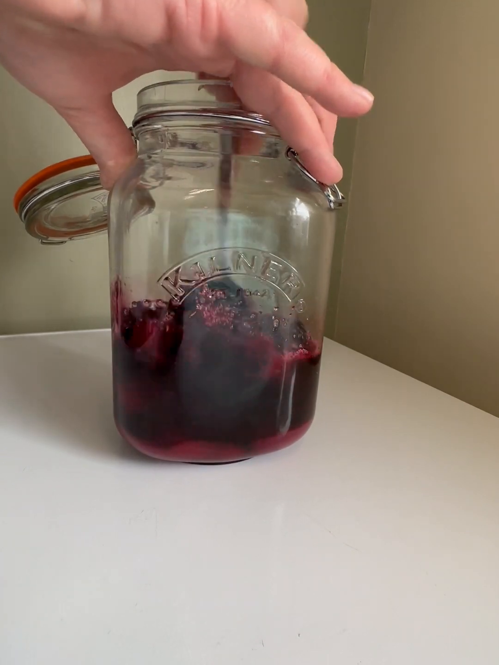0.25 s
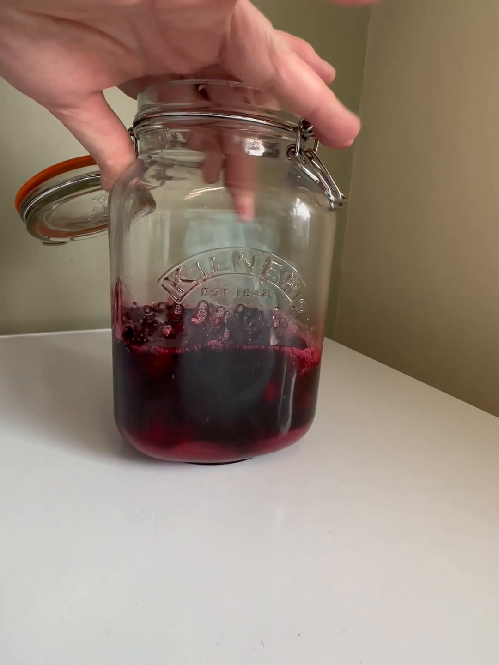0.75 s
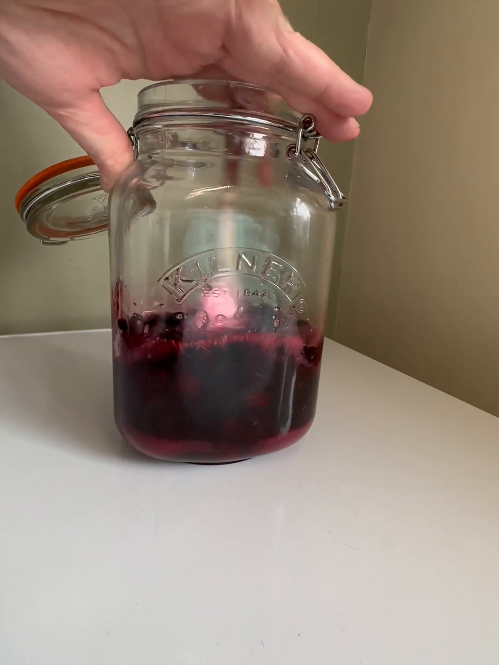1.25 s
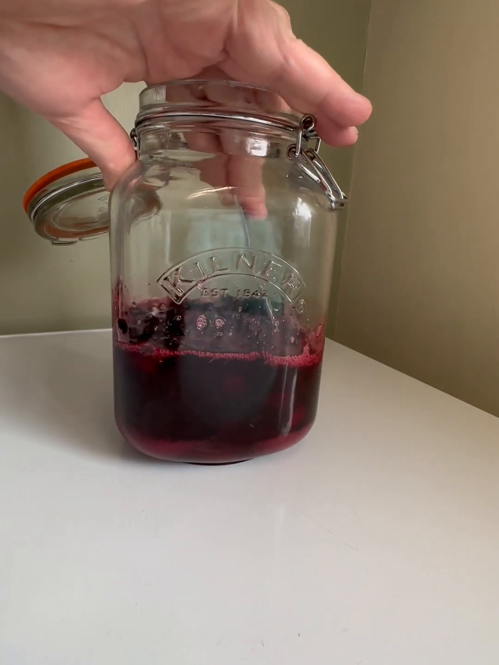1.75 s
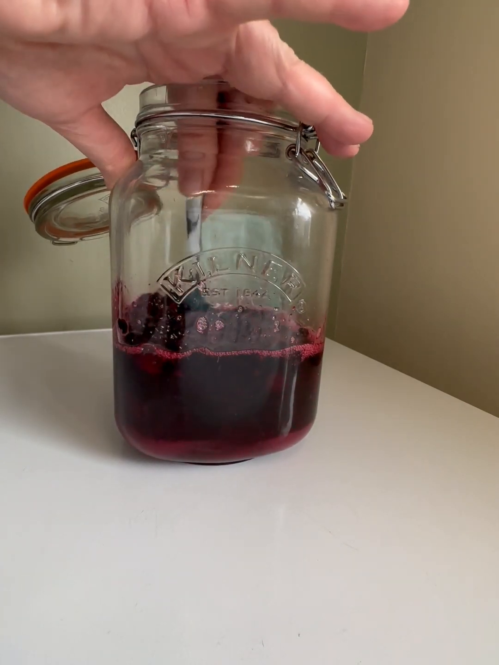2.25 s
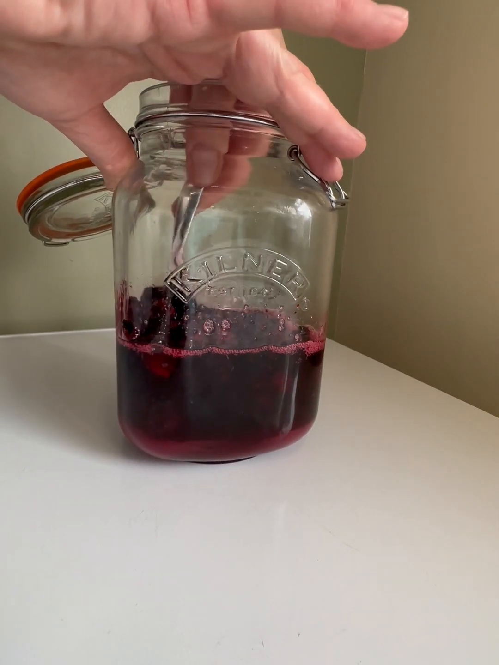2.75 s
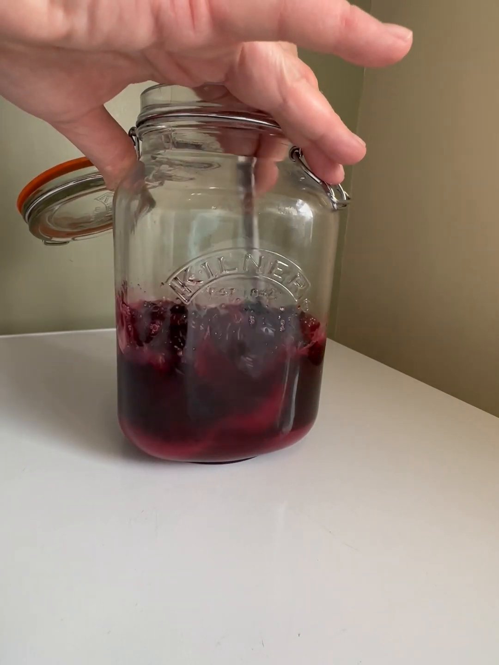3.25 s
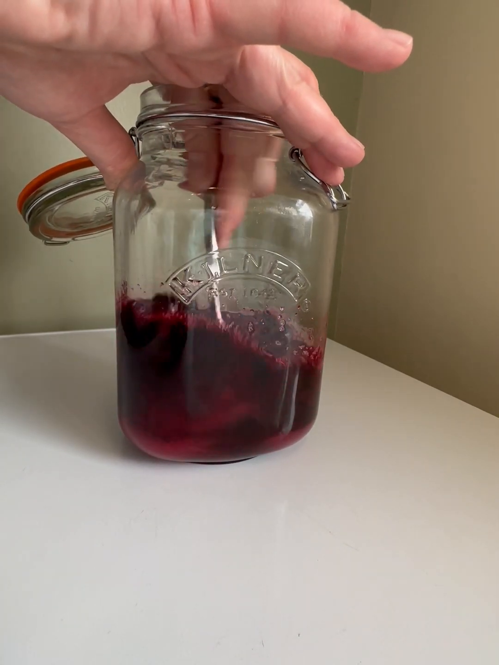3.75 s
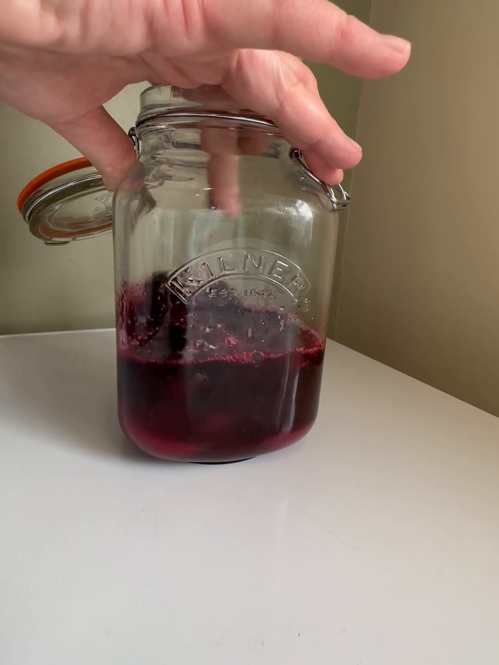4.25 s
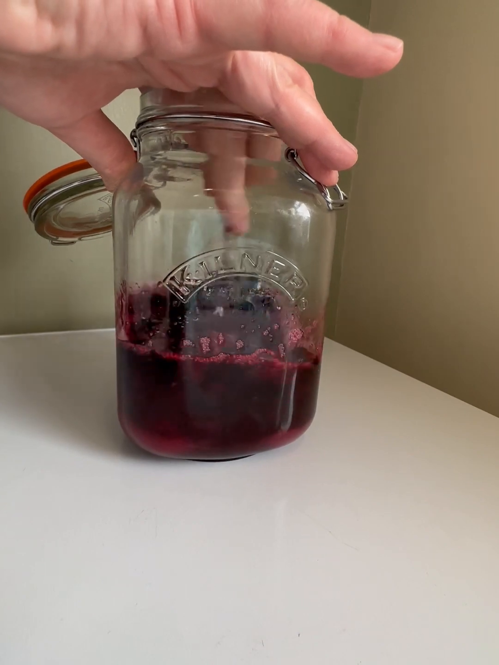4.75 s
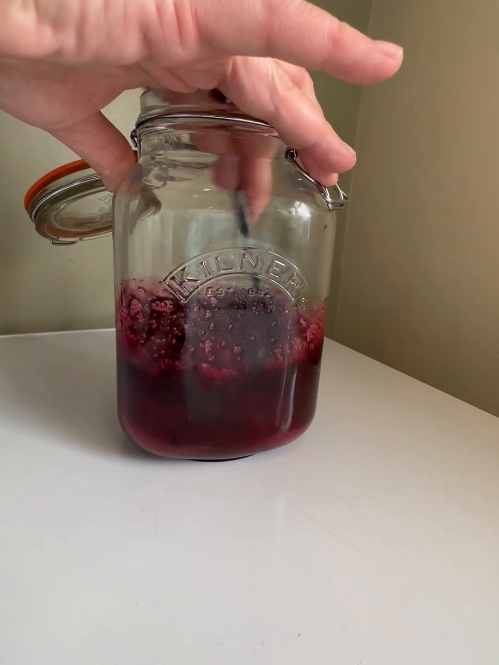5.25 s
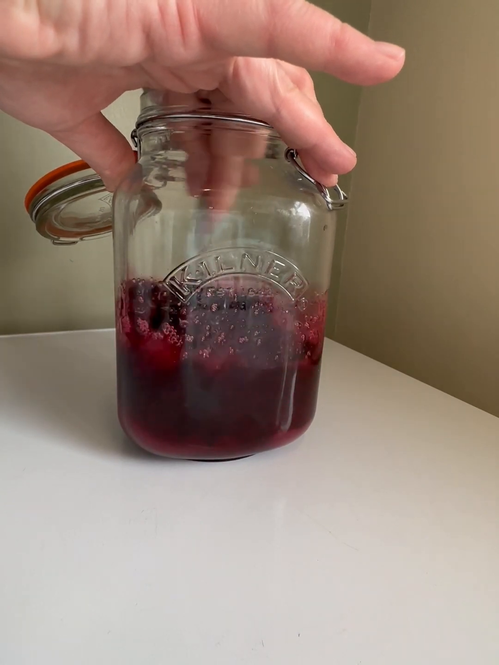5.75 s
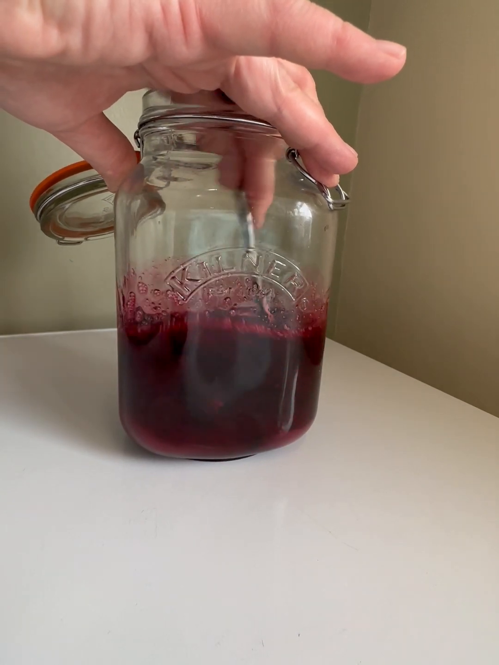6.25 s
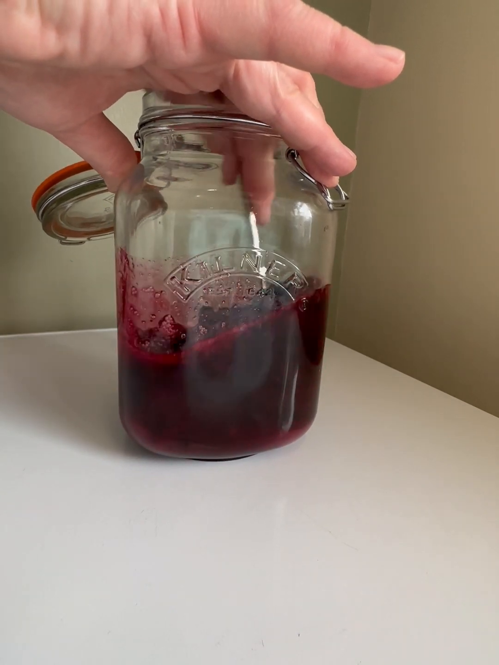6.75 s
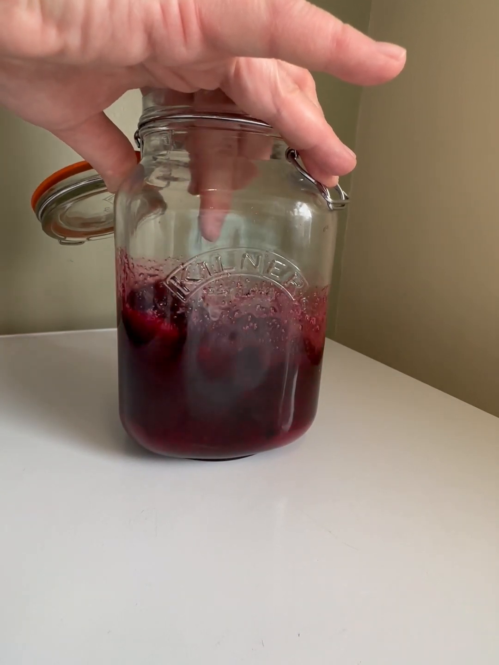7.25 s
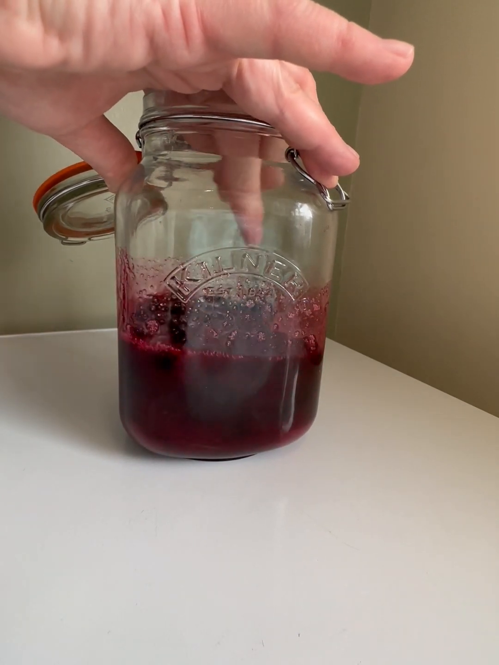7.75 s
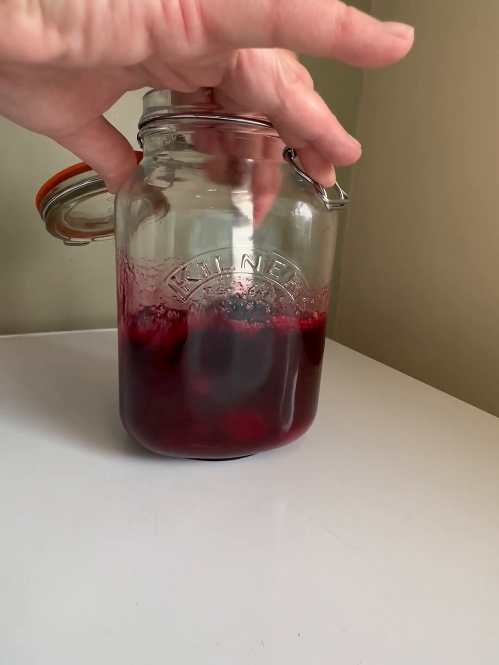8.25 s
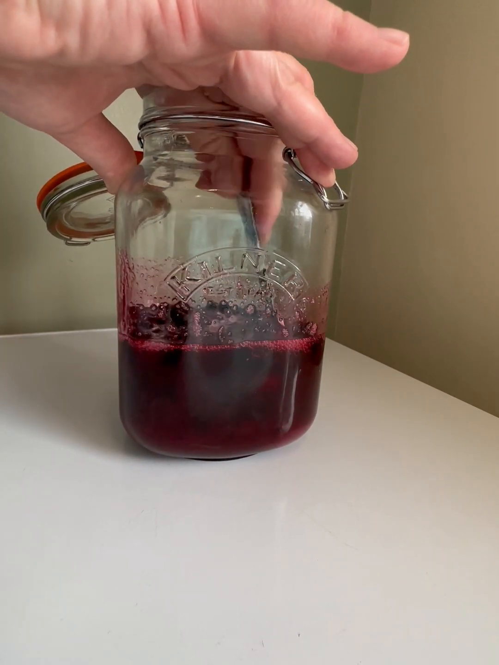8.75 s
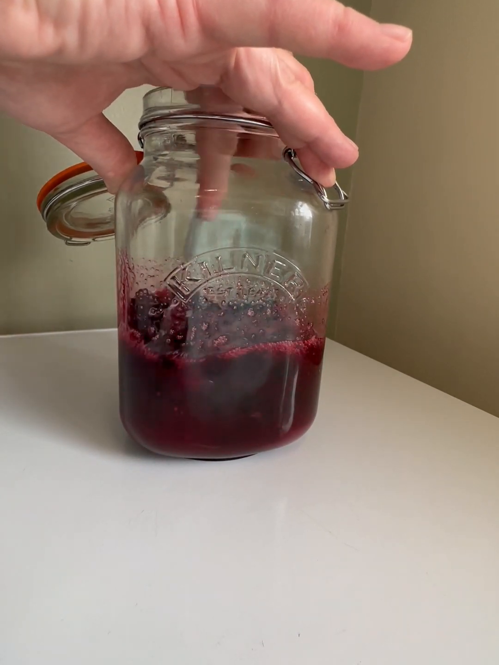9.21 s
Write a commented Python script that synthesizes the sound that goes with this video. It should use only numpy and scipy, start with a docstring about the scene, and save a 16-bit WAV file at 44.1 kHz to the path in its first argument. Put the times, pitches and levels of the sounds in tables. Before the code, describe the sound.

A spoon stirs syrupy berries in a thick glass jar, with dull clinks, gritty sugar scraping, wet squelches and low counter thumps, growing busier.

```python
"""Spoon stirring berries in a glass jar

A spoon stirs berries and sugar in a thick glass jar on a kitchen counter, heard close up in stereo.
Blows on the syrup-damped glass are short tone pairs with a noisy crunch; strokes grind sugar as
resonant noise and pings; the fruit squelches in rising blobs of tone; shoves and drags ring the
counter's low modes. Lone rings, thin whines, an early dull swish and a low room hum lie around them.
"""
import sys
import numpy as np
from scipy import signal
from scipy.fft import rfft, irfft, next_fast_len
from scipy.io import wavfile
from scipy.ndimage import uniform_filter1d, map_coordinates

SR = 44100
rng = np.random.default_rng(int(sys.argv[2]) if len(sys.argv) > 2 else 0)


def materialize(psi):
    """Save the field psi as 16-bit PCM at rate SR to the path in sys.argv[1].

    A 1-D psi becomes a single channel; in a 2-D psi each row is a channel.
    """
    bounded = np.clip(np.atleast_2d(psi).T, -1, 1)
    quanta = np.round(bounded * 32767).astype(np.int16)
    wavfile.write(sys.argv[1], SR, quanta)


def invert_db(level):
    """Linear amplitude ratio for a level in decibels (20 dB per decade), elementwise."""
    return 10 ** (np.asarray(level, dtype=float) / 20)


N = 418068  # length in samples

# Clear blows of the spoon on glass. Each row: start in seconds, knock level in dB before trims,
# knock pitch in Hz, upper ring pitch in Hz, upper ring and treble in dB relative to the knock.
BLOWS = [(0.031, -53, 820, 3220, 4, -16), (0.242, -57.5, 824, 3740, -1, -3),
         (0.733, -49, 1000, 2420, -11, -35), (0.778, -36, 2270, 4540, -6, -7),
         (0.782, -19.5, 1440, 2480, -10.5, -30), (0.82, -38, 1200, 2360, -9, -24),
         (0.833, -17.5, 1155, 2350, -9, -37), (0.886, -31.5, 1250, 2250, -18, -35),
         (0.9025, -34.5, 2130, 3300, -8, -38), (1.072, -31.5, 1530, 4530, 2, -19),
         (1.27, -43.5, 1640, 2540, -9, -8.5), (1.586, -38, 784, 3120, 4, 1.5),
         (1.635, -35, 1660, 3020, -0.5, -10), (1.691, -29, 1650, 3300, -2, -12),
         (1.949, -17.5, 1524, 2900, -3.5, -40), (1.998, -32, 1570, 3080, -13, -12.5),
         (2.24, -46.5, 1780, 5410, -21, 6.5), (2.498, -44, 1170, 3170, -5, -6),
         (2.515, -47.5, 802, 2450, 8, 2), (2.53, -35, 810, 2950, 3.5, 9.5),
         (2.56, -44.5, 805, 3020, 2.5, 5), (2.66, -52, 1600, 5740, -4, 5.5),
         (2.671, -45, 1070, 3220, -3, -6), (2.695, -41, 1030, 3200, 2, -2.5),
         (2.761, -31, 1550, 3300, -9.5, -4), (2.817, -34, 1110, 5630, -3, -10),
         (2.827, -45, 1530, 3240, 0, -7), (2.929, -42, 1480, 3800, -1, -13), (2.98, -45, 1460, 3250, 2, 1),
         (3.016, -36.5, 1800, 3030, -6, -15), (3.238, -38, 1165, 3800, -7.5, -13),
         (3.493, -31, 1240, 2610, -8.5, -8), (3.684, -27, 1080, 2630, -7.5, -16),
         (3.716, -17.5, 1084, 3500, -17, -38), (3.833, -34, 1100, 2620, -17, -12.5),
         (4.133, -39.5, 1800, 2520, -7.5, -17), (4.356, -39, 2120, 3010, 6, 3),
         (4.629, -43.5, 1990, 2500, -1.5, -22), (4.747, -29.5, 930, 2220, -9.5, -8.5),
         (4.817, -45, 1620, 3800, -5, -3), (4.833, -33.5, 1390, 3580, -9.5, -10.5),
         (4.881, -33.5, 1440, 3240, -8.5, -5), (4.933, -27.5, 1590, 4010, -6, 1.5),
         (4.982, -23, 1630, 3330, -7.5, -5), (4.991, -17.5, 1040, 3060, -3, -12.5),
         (5.105, -35.5, 1980, 4180, -2, -5), (5.143, -46.5, 2170, 3260, 9.5, -2),
         (5.163, -38, 1130, 4120, -0.5, -5), (5.36, -22, 1510, 3720, -18, -21.5),
         (5.423, -33.5, 1200, 4070, -11, 1), (5.438, -18, 1120, 2120, -21, -33),
         (5.475, -43, 1210, 3060, -1, -15), (5.495, -42, 2140, 3130, -8, -17),
         (5.529, -43, 1760, 2610, -1, 0), (5.653, -37.5, 1800, 2930, -5.5, -7),
         (5.695, -32, 1110, 2760, -8, -14), (5.711, -28, 1450, 2950, -3.5, -5.5),
         (5.829, -31, 1280, 3520, -14, -30), (5.873, -31, 1710, 2200, -6.5, -13),
         (5.913, -38.5, 1280, 3580, 3.5, -1), (5.931, -20, 1390, 3070, -3.5, -7),
         (6.259, -18, 1540, 2630, -2.5, -8.5), (6.363, -22.5, 1790, 2810, -2.5, -12),
         (6.42, -9.5, 1155, 2560, -38, -37), (6.461, -30.5, 2000, 4260, 6, -15),
         (6.475, -33.5, 1800, 3640, 7.5, -7.5), (6.504, -35.5, 1830, 2800, 11, 1),
         (6.525, -37, 1200, 2620, -4, -10), (6.775, -37, 1520, 3050, -5, -8),
         (6.813, -17.5, 1430, 2630, -2.5, -11.5), (6.897, -35.5, 904, 2570, -11, -14),
         (6.942, -37.5, 1500, 3580, -0.5, -18), (7.021, -35, 1720, 2470, -12, -34),
         (7.3643, -4, 1104, 4070, -19.5, -18.5), (7.423, -26.5, 1155, 2350, -7, -7),
         (7.432, -43, 1850, 2220, 3.5, 3), (7.471, -42, 1540, 2870, -6, -19),
         (7.521, -40, 2130, 2240, 3.5, 3), (7.627, -24, 1800, 3990, -3, -2),
         (7.645, -26, 1800, 2390, -1.5, -7), (7.725, -42, 920, 2440, -19, -12),
         (7.836, -27.5, 1740, 3020, -8, -30), (7.846, -7, 900, 2960, -26, -49),
         (7.901, -11.5, 1480, 2390, -10, -18.5), (7.96, -32, 1720, 2580, -18, -18),
         (7.995, -37.5, 1580, 3830, -13, -26), (8.019, -37, 1850, 3960, 5, -21),
         (8.033, -28, 1090, 3160, -2, -9), (8.054, -30.5, 1580, 3120, -9, -1),
         (8.059, -25, 955, 5350, -2, 3.5), (8.089, -41.5, 1560, 3040, 4, -13),
         (8.131, -30, 1120, 2820, -5, -6), (8.15, -26.5, 1236, 2180, -11.5, -18),
         (8.205, -36, 1210, 2550, -30, -19), (8.391, -30, 1850, 3220, 0.5, -1.5),
         (8.459, -38, 1700, 3190, 6, -3), (8.469, -31, 1700, 3180, 1, -5), (8.52, -38, 1210, 3400, 2, -15),
         (8.648, -28.5, 1710, 2300, -6.5, -9.5), (8.672, -35.5, 1720, 2580, -7, -7),
         (8.869, -16, 1390, 2727, -2.5, -10), (8.887, -29, 1170, 3250, 2.5, -11),
         (8.922, -16.5, 1146, 2470, -23, -33), (8.936, -26, 1360, 2350, -8, -26),
         (8.942, -22, 1090, 2830, -12, -36), (8.957, -36, 1150, 2450, -4, -12),
         (8.981, -40.5, 1330, 3700, -2, -3), (9.022, -25, 1970, 2780, -9, -12),
         (9.066, -33.5, 1800, 4500, -5.5, -10), (9.083, -25.5, 880, 3160, -37, -35),
         (9.139, -36.5, 1680, 3870, 5, -5.5), (9.397, -43.5, 1730, 2370, -8.5, -32)]
# Shoves that rock the jar on the counter. Each row: start in seconds, level in dB before trims,
# middle modes and upper modes in dB relative to it.
SHOVES = [(0.602, -22.5, -23, -61), (0.713, -16, -10, -27), (0.966, -20.5, -15.5, -28.5),
          (1.116, -31.5, -13, -37), (1.513, -32, 0, -14), (1.639, -26, -2, -8), (1.694, -16, -13, -16.5),
          (1.918, -22, -36, -34), (1.989, -33, 2.5, -7), (2.131, -31, -9, -21), (2.427, -31, 3.5, -31),
          (2.526, -26.5, -3, -24), (2.797, -40, 6, -5.5), (2.996, -36.5, 1.5, -7), (3.246, -31, -11, -10.5),
          (3.497, -22.5, 1.5, -6.5), (3.686, -22.5, -2.5, -18), (3.83, -33, 2.5, -8.5),
          (4.148, -33.5, -17, -20), (4.477, -25, -8.5, -24.5), (4.596, -16.5, -12.5, -46),
          (4.631, -16.5, -1.5, -17), (4.75, -22.5, -3.5, -18), (4.88, -24.5, -26, -15),
          (5.106, -30, -21, -22), (5.439, -18, -8.5, -10.5), (5.655, -22.5, -5.5, -11.5),
          (5.733, -20.5, -18, -18.5), (5.927, -22, -4.5, -7.5), (6.113, -17, -3, -23),
          (6.255, -19.5, -3, -4.5), (6.361, -20.5, -9, -17), (6.422, -13, 0.5, -11),
          (6.653, -27.5, -17, -32), (6.792, -16.5, -7, -15), (7.032, -26, -33, -21), (7.362, -27, -1, -5),
          (7.631, -24.5, -6, -26), (7.846, -17, -29, -14.5), (7.9, -19, -11, -8.5), (7.92, -5, -5.5, -22),
          (8.06, -33, -46, -10.5), (8.167, -21, -7.5, -12.5), (8.514, -18, -0.5, -14),
          (8.653, -32.5, 4, 2.5), (8.879, -14, -1, -33), (9.018, -26, -7, -10)]
# Jar wall, damped by syrup and hand. Each row: resonance in Hz, width in Hz, gain in dB.
WALL_MODES = [(1000, 383, 3), (1550, 395, 4.5), (1800, 420, 2), (2630, 81, 0), (3016, 450, -3.5),
              (4200, 1400, -8.5), (5180, 710, 1), (6460, 880, 3.5), (7720, 3530, -3.5), (15300, 1000, -13)]
# Counter top. Each row: mode in Hz, relative level in dB, t60 in seconds.
COUNTER_MODES = [(73.9, -3, 0.22), (142.3, -0.5, 0.11), (150.4, -7, 0.061), (257.2, -2, 0.15),
                 (307.3, 0, 0.21), (411, -12, 0.041), (543, -7.5, 0.18), (678, -61, 0.54),
                 (795, -23.5, 0.13)]
# Colour of the grinding noise. Each row: frequency in Hz, relative density in dB per Hz.
GRINDING_COLOUR = [(290, -26), (500, 4.5), (787, -8), (1610, -7.5), (2430, -1.5), (3210, -16.5),
                   (4900, -19), (6100, -24.5), (7710, -20.5), (8930, -24.5), (12300, -73), (15100, -24),
                   (16500, -33)]
# Colour of the room tone. Each row: frequency in Hz, relative density in dB per Hz.
ROOM_COLOUR = [(15, -21), (25, 4.5), (53, 12.5), (76, 7.5), (154, 3), (214, -9.5), (470, -8), (510, -6.5),
               (787, -16.5), (1090, -23), (2400, -29), (2980, -30), (3910, -28), (7920, -107), (16500, -85)]
# Phase lead of left over right, nearly opposite at 10 to 14 kHz. Each row: frequency in Hz, lead in
# radians.
LEFT_LEAD = [(0, 0), (500, -.5), (800, -1.2), (1300, -1), (1600, .2), (2500, .6), (4200, .2), (4800, -2.5),
             (5200, -3), (6100, -7.2), (7750, -9.3), (9000, -7.8), (10200, -9.4), (13800, -9.5),
             (15500, -10.4)]
# Balance of left and right. Each row: frequency in Hz, left minus right in dB.
LEFT_TILT = [(60, -0.39), (130, 0.5), (290, 0.37), (640, 1), (1410, -0.4), (3100, -0.43), (6820, -0.67),
             (15000, 0.18)]
# Likeness of left and right before the lead is applied. Each row: frequency in Hz, likeness from 0 to 1.
LIKENESS = [(30, .5), (70, .87), (170, .99), (350, .6), (700, .05), (1300, .3), (1800, .7), (2500, .6),
            (4000, .5), (9000, .5), (10500, .96), (13800, .96), (15500, .5)]
# The spoon's own clink. Each row: pitch in Hz, relative level in dB.
SPOON_MODES = [(4400, -33), (5450, -7), (6200, -5)]
# Strokes along the wall. Each row: start in seconds, end in seconds, then grinding, brightness and
# drag of the jar's foot as control levels in dB.
WALL_STROKES = [(0, 0.066, -62, -65, -48.5), (0.977, 1.6, -74, -74, -66), (1.585, 1.768, -69, -67.5, -47.5),
                (1.839, 2.277, -54, -62.5, -49.5), (2.327, 2.435, -57.5, -72, -50),
                (2.486, 2.584, -64, -62, -46.5), (2.68, 3, -50.5, -61, -47.5),
                (3.6, 3.683, -51.5, -58, -43), (3.677, 3.723, -51, -79, -34), (3.79, 4.175, -55, -70, -60),
                (4.558, 4.67, -75, -66.5, -46), (4.764, 5.028, -49, -60.5, -45.5),
                (5.119, 5.19, -70, -58.5, -42.5), (5.437, 5.584, -53.5, -60, -51),
                (5.71, 5.727, -62, -60, -42.5), (5.85, 5.987, -44.5, -63.5, -47),
                (6.271, 6.537, -47, -65, -47), (6.647, 7.045, -58, -64, -47.5),
                (7.382, 7.456, -44, -65, -44), (7.633, 7.788, -47, -61.5, -42.5),
                (7.844, 8.157, -45.5, -56.5, -41), (8.472, 8.552, -41.5, -54.5, -41.5),
                (8.824, 9.127, -70, -60.5, -41)]
# Control levels between strokes, one row: grinding in dB, brightness in dB, drag in dB.
RESTING_DB = (-88, -79.5, -56)
# Wavering whines, some from the rubbed wall. Each row: start in seconds, end in seconds, centre in Hz,
# width in Hz, mid-waver level in dB.
THIN_WHINES = [(0.11, 0.5, 4020, 200, -69), (0.95, 1.6, 2460, 60, -70), (1.35, 1.6, 7900, 120, -67.5),
               (2.12, 2.3, 2370, 70, -74), (4.847, 4.898, 1530, 200, -53)]
# Tones that outlast a blow or bubble up alone. Each row: start in seconds, pitch in Hz, level in dB,
# t60 in seconds.
LONE_TONES = [(0.786, 3000, -43, .07), (1.995, 1550, -36.5, 0.12), (3.722, 1475, -48, 0.25),
              (8.153, 2070, -28, 0.044), (8.172, 535, -18.5, 0.057), (8.872, 2710, -19.5, 0.072),
              (3.045, 1800, -54, .2), (4.663, 568, -38, .1), (7.847, 914, -14, 0.05)]
# Detuning spread of each counter mode per shove, one row: a fraction of the pitch for each mode.
MODE_SCATTER = (.04, .07, .07) + (.05,) * 6
# Crushed sugar, one row: trims in dB for the low, middle and top of the wall.
CRUSH_DB = (1.5, 9.5, 4.5)
# Tones that the rubbed wall sings. Each row: centre in Hz, width in Hz, gain in dB.
SINGING_MODES = [(1200, 38, 5), (1590, 135, 16), (2550, 92, 0.5), (3170, 70, 3)]


def ticks(contacts):
    """Each contact knocks and rings at its own pitches, and crushes sugar against the wall."""
    knock_trim_db, upper_trim_db, clink_trim_db, clink_scatter_db = -2, 1, -5.5, 5
    swell_s, sag_share = 0.0015, 0.3  # time to the peak; how far above its final pitch a knock starts
    crush_s, tail_t60_s, lead_in_s, lead_in_db = 0.0021, 0.13, 0.007, -21
    knocks, crush = np.zeros((2, N + SR)), np.zeros((3, 2, N + SR))
    t = np.arange(SR // 6) / SR
    # the contact stiffens, then lets go with sagging pitch
    swell = (t / swell_s * np.exp(1 - t / swell_s)) ** 2
    sagging_t = t + sag_share * swell_s * (1 - np.exp(-t / swell_s))
    u = t / crush_s
    burst = (u * np.exp(1 - u)) ** 2
    # a faint noise swells for a few milliseconds before each contact
    lead_in = np.exp((np.arange(800) - 800) / SR / lead_in_s)

    def peak(x):
        """Scaled to peak 1."""
        return x / np.abs(x).max()

    for s, db, low_hz, upper_hz, upper_db, treble_db in contacts:
        start = round(s * SR)
        levels_db = db + np.array([0, upper_db, treble_db])
        low = swell * np.sin(2 * np.pi * low_hz * sagging_t) + ring(low_hz, -8, 0.035, 0.002, t)
        upper = swell * np.sin(2 * np.pi * upper_hz * t) + ring(upper_hz, -3, 0.04, 0.002, t)
        knock = invert_db(db + knock_trim_db) * peak(low) + invert_db(db + upper_db + upper_trim_db) * peak(upper)
        for hz, level_db in SPOON_MODES:  # every contact shares the clink out anew
            clink_db = db + treble_db + level_db + clink_trim_db + rng.normal(0, clink_scatter_db)
            knock = knock + ring(hz, clink_db, 0.035, 0.0011, t)
        knocks[:, start:start + len(t)] += [knock, 0.11 * np.roll(knock, 17)]

        # the crush starts 1 ms ahead of the knock; the kitchen's faint tail is weaker on louder blows
        tail_db = -6.5 - 0.3 * (levels_db.max() + 21.5) - 60 * t / tail_t60_s
        shape = burst + invert_db(tail_db) * (1 - np.exp(-u))
        gain = invert_db(levels_db + CRUSH_DB)[:, None, None]
        early = start - SR // 1000
        crush[..., early:early + len(t)] += gain * shape * rng.standard_normal((3, 2, len(t)))
        faint = invert_db(lead_in_db) * lead_in * rng.standard_normal((3, 2, len(lead_in)))
        crush[..., start - len(lead_in):start] += gain * faint
    wall_parts = WALL_MODES[:3], WALL_MODES[3:6], WALL_MODES[6:]
    return knocks[:, :N] + sum(filtered(c[:, :N], wall(part)) for c, part in zip(crush, wall_parts))


def strays(grind_db, count):
    """Seeds and crystals make the spoon skip: contacts at random moments that follow the stroke's level."""
    trim_db, scatter_db, pitch_hz, upper_db, treble_db = -8, 6, 1850, 1.5, -7
    when, size, low, upper = rng.random((count, 4)).T
    db = grind_db[(when * N).astype(int)] + trim_db - scatter_db * np.log(size + 0.11)
    starts = 0.027 + when * N / SR  # leaves room for the lead-in of the first contact
    low_hz, upper_hz = pitch_hz * 2 ** (low - 1), pitch_hz * 2 ** (upper + 0.3)
    return [(s, d, a, b, upper_db, treble_db) for s, d, a, b in zip(starts, db, low_hz, upper_hz)]


def stirring():
    """Grinding, brightness and drag in dB: every stroke presses, holds and lifts over the resting level."""
    press_s, lift_s = 0.035, 0.032  # a stroke digs in ahead of its start, and lets go after its end
    t = np.arange(N) / SR
    power = invert_db(np.array(RESTING_DB))[:, None] ** 2 * np.ones(N)
    for start, end, *levels_db in WALL_STROKES:
        press = np.clip((t - start) / press_s + 1, 0, 1)
        lift = np.exp(-np.maximum(t - end, 0) / lift_s)
        power += (invert_db(np.array(levels_db))[:, None] * press * lift) ** 2
    return 10 * np.log10(power)


def grinding(grind_db, bright_db):
    """Sugar slips in clumps under the spoon and sings in the wall; two draws, one per stereo mix."""
    unrung, split_hz = 0.5, 3500  # grit heard past the wall's resonances; where low and treble part
    slips = np.array([grains(count=10000, cycles=5.0, spread_db=1.5) for _ in range(2)])
    rub = 0.9 * slips + rng.standard_normal((2, N))
    clumps = invert_db(2 * wobble(45) + wobble(120))
    grit = clumps * patchy(rub, depth_db=3.5)

    def colour(hz):
        """Grinding colour through the damped and the singing wall."""
        rung = np.abs(wall(WALL_MODES)(hz)) + np.abs(wall(SINGING_MODES)(hz))
        return invert_db(along(GRINDING_COLOUR, hz)) * (unrung + rung)

    flutter_db = 2.5 * wobble(30)  # the treble comes in drier bursts
    low = unit(filtered(grit, lambda hz: colour(hz) / (1 + (hz / split_hz) ** 6)))
    high = unit(filtered(grit, lambda hz: colour(hz) / (1 + (split_hz / (hz + 1)) ** 6)))
    return invert_db(grind_db - 10.0) * low + invert_db(bright_db + 8.0 + flutter_db) * high


def grains(count, cycles, spread_db):
    """Crystals and seeds slipping on glass: tiny damped pings at scattered pitches."""
    when, pitch, size = rng.random(count), rng.standard_normal(count), rng.exponential(size=count)
    hz = np.clip(3000 * np.exp(0.75 * pitch), 500, 16000)[:, None]
    t = np.arange(256) / SR
    gain = invert_db(spread_db * np.minimum(size, 3))[:, None] * np.sqrt(hz)
    fade = t * hz * np.exp(-t * hz * 3 / cycles)
    pings = gain * fade * np.sin(2 * np.pi * hz * t)
    at = (when * N).astype(int)[:, None] + np.arange(256)
    return unit(np.bincount(at.ravel(), pings.ravel(), N + 256)[:N])


def squelches(level_db, centre_hz, rise, count):
    """Pockets of air among the berries close with short soft blobs of tone that glide upward."""
    cycles = 10  # a blob's life, counted at its starting pitch
    when, pitch, size = rng.random((count, 3)).T
    hz = (centre_hz * 2.5 ** (2 * pitch - 1))[:, None]
    life = np.arange(2048) / SR * hz / cycles
    turns = cycles * life * (1 + rise * np.minimum(life, 2) / 2)
    blobs = life * np.exp(-3 * life) * np.sin(2 * np.pi * turns)
    blobs *= np.hanning(4096)[2048:]
    blobs *= invert_db(8.1 * size)[:, None]
    at = (when * N).astype(int)[:, None] + np.arange(2048)
    wet = unit(np.bincount(at.ravel(), blobs.ravel(), N + 2048)[:N])
    return invert_db(level_db) * np.array([wet, 1.5 * np.roll(wet, 17)])


def thumps():
    """A shove rocks the jar: a slow push rings the low modes, the lurching fruit shakes the upper ones."""
    lurch_s, soft_hz = 0.0056, 1100  # time to the lurch's peak; soft fruit gives little treble
    thud, t = np.zeros(N + SR), np.arange(SR // 2) / SR
    hz = np.fft.rfftfreq(SR // 2, 1 / SR)
    u = t / lurch_s
    luck = rng.uniform(-1.15, 1, (len(SHOVES), len(COUNTER_MODES))) * MODE_SCATTER
    for (s, db, middle_db, upper_db), detune in zip(SHOVES, luck):
        modes = [(f * (1 + d), level, t60) for (f, level, t60), d in zip(COUNTER_MODES, detune)]
        body = sum(ring(f, level + share_db, t60, 2.17 / nominal[0], t)
                   for (f, level, t60), nominal, share_db
                   in zip(modes, COUNTER_MODES, [0, middle_db, middle_db]))
        lurch = invert_db(db + upper_db + 31.5) * u * np.exp(1 - u) * rng.standard_normal(len(t))
        shaken = irfft(rfft(lurch) * counter(modes[3:])(hz) / (1 + 1j * hz / soft_hz))
        thud[round(s * SR):][:len(t)] += invert_db(db + 8) * body + shaken
    return thud[:N]


def drag(drag_db):
    """The loaded foot of the jar shudders unevenly into the same counter modes."""
    shudder = rng.standard_normal(N) * invert_db(3 * wobble(25))
    return invert_db(drag_db) * unit(filtered(shudder, counter(COUNTER_MODES)))


def rings():
    """Lone tones of glass or trapped air: a soft start and an exponential fade."""
    out, t = np.zeros(N + SR), np.arange(SR // 4) / SR
    for s, hz, db, t60 in LONE_TONES:
        out[round(s * SR):][:len(t)] += ring(hz, db, t60, 0.0009, t)
    return np.array([out[:N], 0.15 * np.roll(out[:N], 17)])


def whines():
    """Narrow bands of noise that waver, come and go."""
    fade_s = 0.06
    t, out = np.arange(N) / SR, np.zeros((2, N))
    for start, end, hz, width, db in THIN_WHINES:
        waver = invert_db(db + 3.1 * wobble(11.5))
        outside_s = np.maximum(np.maximum(start - t, t - end), 0)
        band = unit(filtered(rng.standard_normal((2, N)), wall([(hz, width, 0)])))
        out += waver * np.exp(-outside_s / fade_s) * band
    return out


def swish():
    """A soft low swish that fades early on: dull noise with a sharp upper edge."""
    level_db, end_s, fade_s, top_hz = -57.5, 0.45, 0.068, 930
    fade = np.exp(-np.maximum(np.arange(N) / SR - end_s, 0) / fade_s)
    edge = lambda hz: np.minimum(hz / 300, 1) / (1 + (hz / top_hz) ** 12)
    return invert_db(level_db) * fade * unit(filtered(rng.standard_normal((2, N)), edge))


def room_tone():
    """Far appliances and air: smooth, slowly breathing noise."""
    noise = filtered(rng.standard_normal((2, N)), lambda hz: invert_db(along(ROOM_COLOUR, hz)))
    breathing_db = 1.5 * wobble(4)
    return invert_db(-47 + breathing_db) * unit(patchy(noise, depth_db=2.5))


def ring(hz, db, t60, rise, t):
    """One mode: a soft start and an exponential fade."""
    return invert_db(db - 60 * t / t60) * (1 - np.exp(-t / rise)) * np.sin(2 * np.pi * hz * t)


def wall(modes):
    """Causal response of broad resonances, alternating in sign, as a function of Hz."""
    return lambda f: sum((-1) ** k * invert_db(db) * 1j * f * width / (c * c - f * f + 1j * f * width)
                         for k, (c, width, db) in enumerate(modes))


def counter(modes):
    """Causal response of some of the counter's modes; a shorter t60 makes a broader mode."""
    return lambda f: sum(invert_db(db) * 1j * f * 3 / t60 / (c * c - f * f + 1j * f * 3 / t60)
                         for c, db, t60 in modes)


def patchy(x, depth_db):
    """Narrow bands swell and fade over about a tenth of a second."""
    z = signal.stft(x, nperseg=512)[2]
    field = uniform_filter1d(rng.standard_normal(z.shape[1:]), 2, 0)  # across frequency
    field = uniform_filter1d(field, 16, 1)  # across time
    return signal.istft(z * invert_db(depth_db * unit(field)), nperseg=512)[1][:, :N]


def wobble(rate):
    """A smooth random curve, rate knots a second."""
    knots = rng.standard_normal(int(N * rate / SR) + 4)
    return map_coordinates(knots, [np.arange(N) * rate / SR])


def unit(x):
    """Scaled to rms 1."""
    return x / np.sqrt(np.mean(x ** 2) + 1e-20)


def along(points, hz):
    """Interpolates (Hz, value) points on a log axis."""
    f, v = np.transpose(points)
    return np.interp(np.log(hz + 1), np.log(f + 1), v)


def filtered(x, response):
    """x shaped by a complex response of frequency."""
    m = next_fast_len(N + SR // 2)
    return irfft(rfft(x, m) * response(np.fft.rfftfreq(m, 1 / SR)), m)[..., :N]


def pair(a, b):
    """Left and right carry a alike and b opposed, then part in phase and level by frequency."""
    turn = lambda hz: np.arccos(np.clip(along(LIKENESS, hz), 0, 1)) / 2
    mid = filtered(a, lambda hz: np.cos(turn(hz)))
    side = filtered(b, lambda hz: np.sin(turn(hz)))
    f, lead = np.transpose(LEFT_LEAD)
    # each channel takes half of the tilt and half of the lead
    half = lambda hz: invert_db(along(LEFT_TILT, hz) / 2) * np.exp(0.5j * np.interp(hz, f, lead))
    return filtered(np.array([mid + side, mid - side]), lambda hz: np.array([half(hz), 1 / half(hz)]))


def scene():
    """The counter feeds both stereo mixes with one thud; ticks, grit and room tone partly differ."""
    grind_db, bright_db, drag_db = stirring()
    air = ticks(BLOWS + strays(grind_db, count=110))
    air += squelches(grind_db - 6, centre_hz=1400, rise=0.1, count=900)
    air += squelches(drag_db - 5.5, centre_hz=380, rise=0.2, count=220)  # deeper, slower air pockets
    air += rings() + grinding(grind_db, bright_db) + room_tone() + whines() + swish()
    thud = thumps()
    alike = air[0] + thud + drag(drag_db)
    opposed = air[1] + 0.79 * np.roll(thud, SR // 300) + drag(drag_db)
    return pair(alike, opposed)


def top_cut(x):
    """Nothing passes above the cut-off."""
    return signal.sosfilt(signal.butter(12, 17150, fs=SR, output="sos"), x)


def record(dry):
    """The microphone's pass band: a soft low cut at 34 Hz and a hard top at 16.5 kHz."""
    band = lambda hz: (hz < 16500) / (1 + (34 / (hz + 1)) ** 4)
    return top_cut(filtered(dry, band))


dry = scene()
out = record(dry)
materialize(out)
```